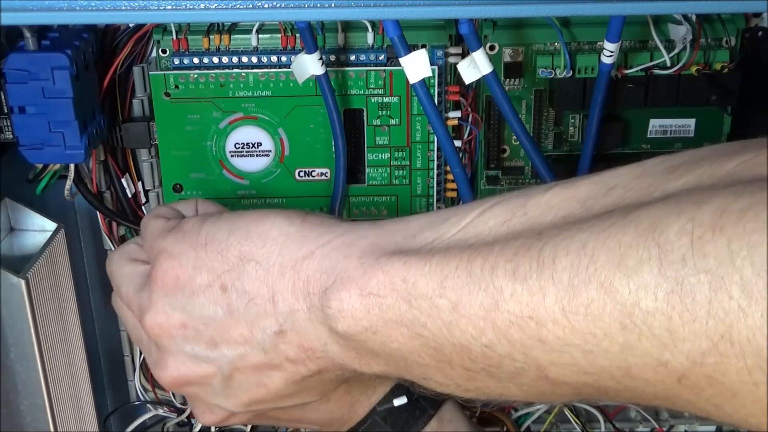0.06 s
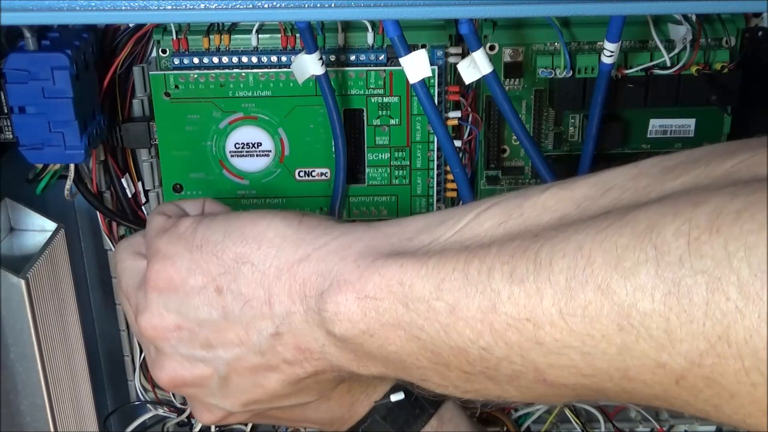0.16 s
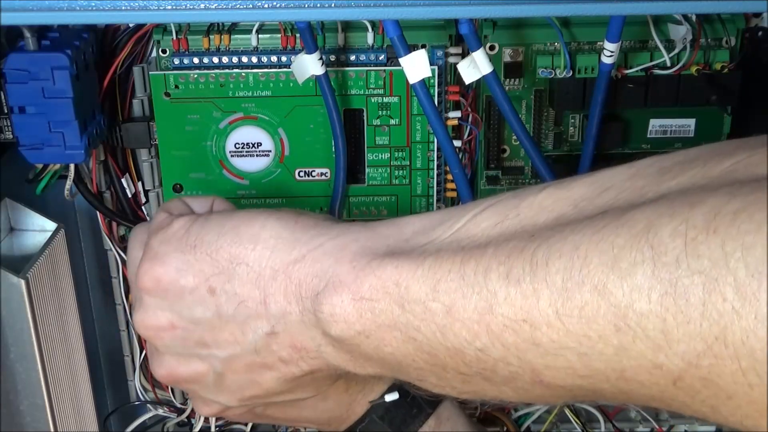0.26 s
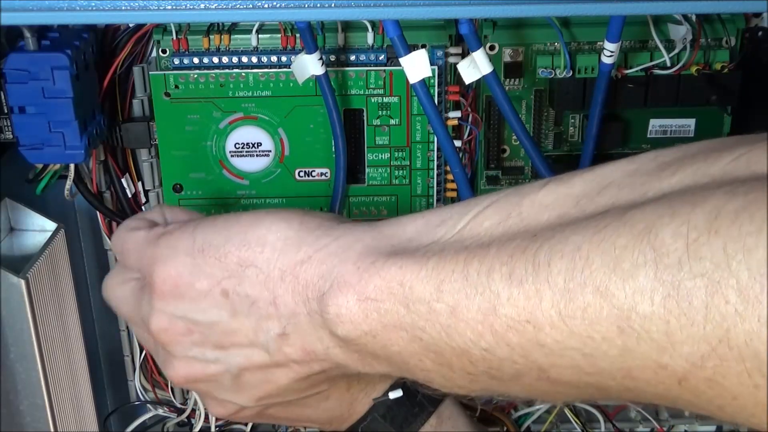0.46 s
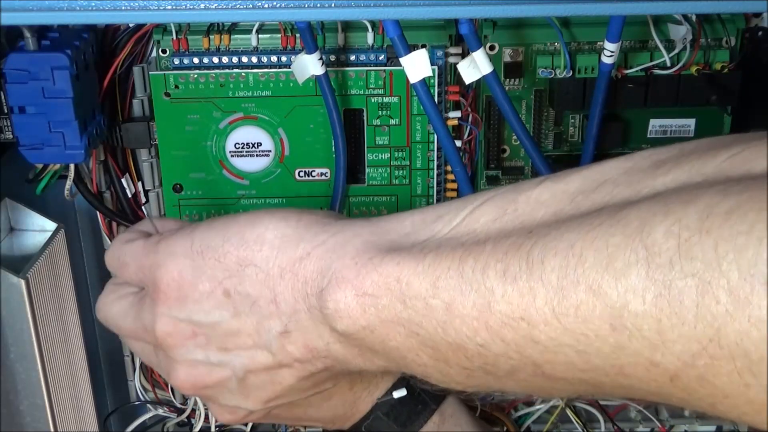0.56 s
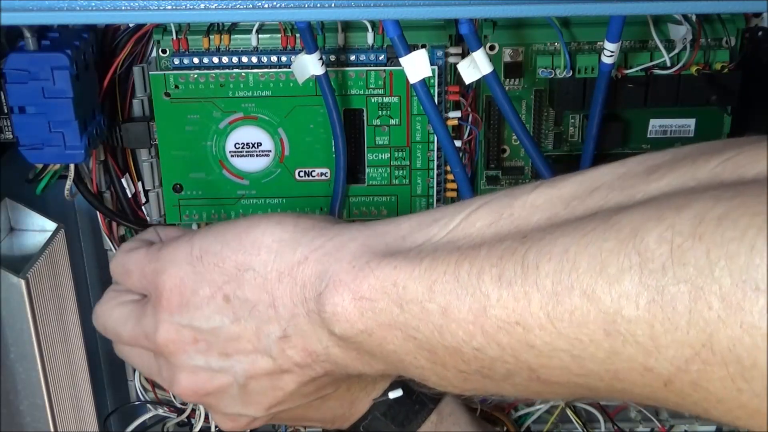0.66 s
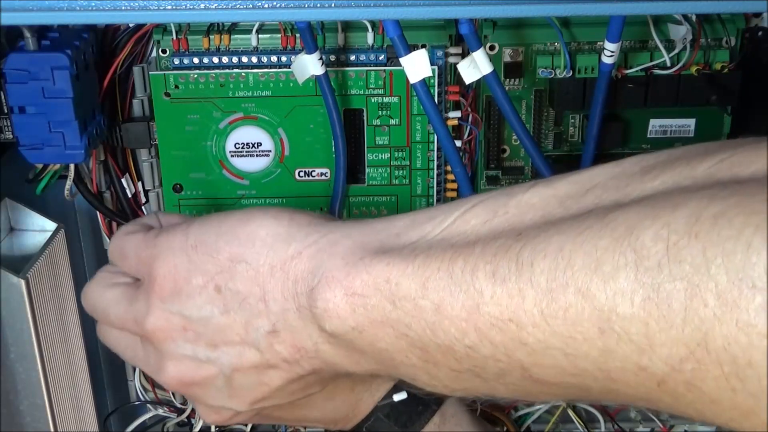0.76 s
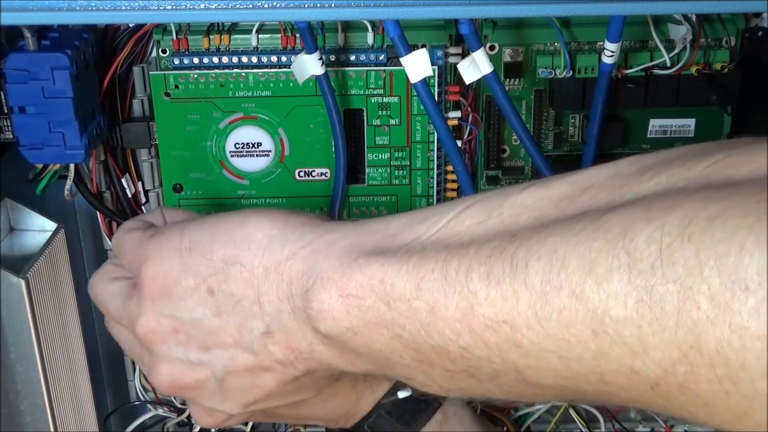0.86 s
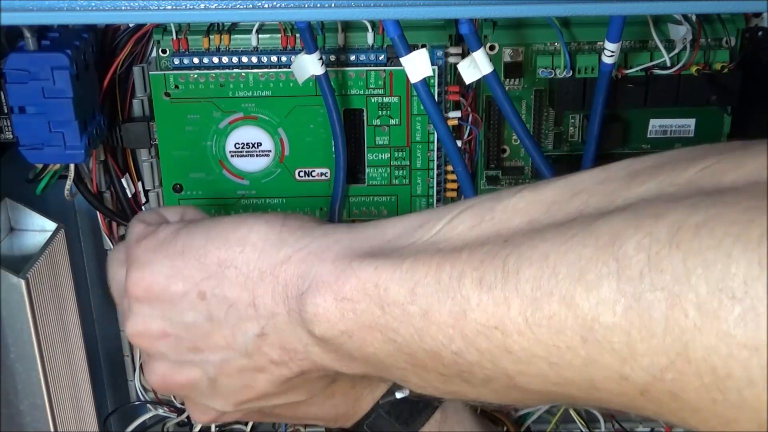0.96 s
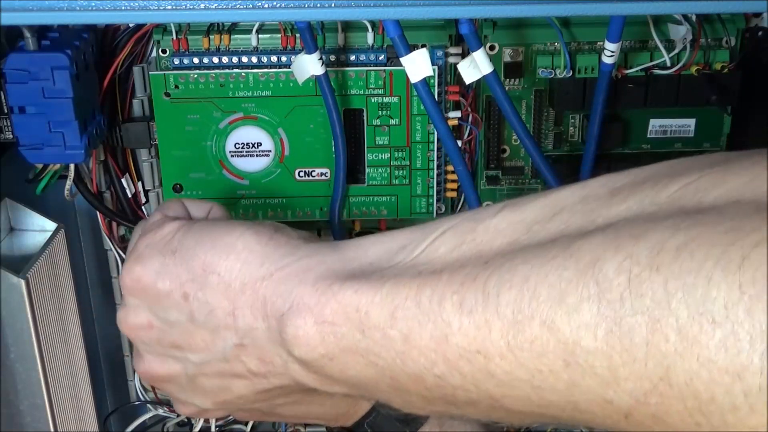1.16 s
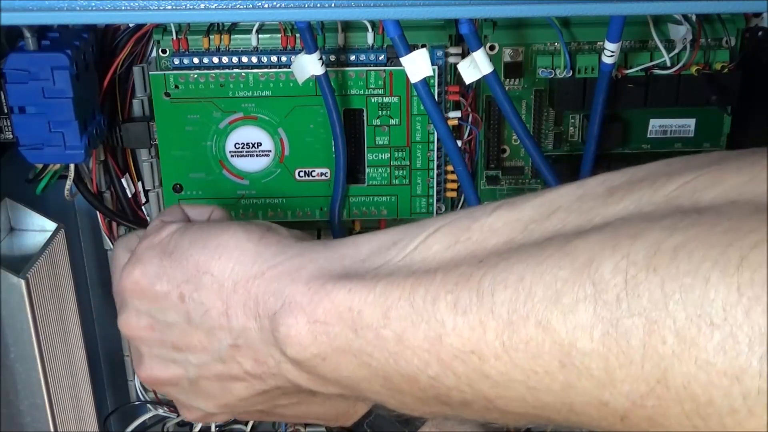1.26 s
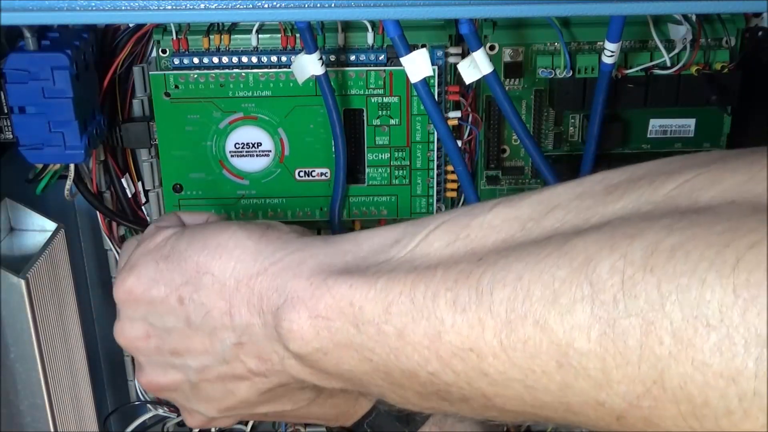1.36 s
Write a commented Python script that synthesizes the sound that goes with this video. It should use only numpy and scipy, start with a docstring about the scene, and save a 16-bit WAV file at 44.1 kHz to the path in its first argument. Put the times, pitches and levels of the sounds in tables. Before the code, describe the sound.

Hands working wires and plastic connectors, with light clicks, a sharp tiny squeak and soft rustling

```python
"""In a control cabinet, hands work wires and plastic connectors close to a microphone.
Taps and soft bumps ring the housing and its parts; a wire squeaks very high against a terminal.
Sleeves and strands rustle as many tiny noise grains. Short tones make a faint tick about 30 times
a second, over the shaped noise of the workshop's hush. Noise tails add the cabinet and walls."""
import sys
import numpy as np
from scipy import signal
from scipy.fft import rfft, irfft
from scipy.io import wavfile
from scipy.ndimage import uniform_filter1d

SR = 44100
rng = np.random.default_rng(int(sys.argv[2]) if len(sys.argv) > 2 else 0)


def wrap_up_sound(samples):
    """Save the sound to the file named by the first command line argument, as 16-bit audio."""
    columns = np.atleast_2d(samples).T
    # keep every value between -1 and 1, then stretch to whole-number steps
    tamed = np.clip(columns, -1, 1)
    steps = np.round(tamed * 32767).astype(np.int16)
    wavfile.write(sys.argv[1], SR, steps)


N = 61739  # samples, 1.4 s


def undb(db):
    """Turn decibels into a plain multiplier."""
    return 10 ** (np.asarray(db) / 20)


def level(x, db):
    """Set the average strength (RMS) of x."""
    return x * undb(db) / np.sqrt(np.mean(x ** 2))


def band(x, lo_hz, hi_hz):
    """Keep only the pitches between two limits."""
    return signal.sosfilt(signal.butter(3, [lo_hz, hi_hz], "bandpass", fs=SR, output="sos"), x)


def fade_60(t, t60_s):
    """A natural fade that falls by 60 dB in t60_s seconds."""
    return np.exp(-np.log(1000) * t / t60_s)


def ring(x, hz, t60_s):
    """One fading resonance, set ringing by x."""
    pole = np.exp(2j * np.pi * hz / SR - np.log(1000) / (t60_s * SR))
    return signal.lfilter([1], [1, -pole], x).imag


def add(out, x, start_s):
    """Mix x into out from start_s on."""
    i = int(start_s * SR)
    out[i:i + len(x)] += x[:N - i]


def blip(peak_s, db, hz, width_ms):
    """A tone that swells and fades around peak_s; its width is taken at half height."""
    time = np.arange(N) / SR - peak_s
    swell = np.exp(-np.log(16) * (time * 1000 / width_ms) ** 2)
    return undb(db) * swell * np.sin(2 * np.pi * hz * time)


def hush():
    """Workshop air and microphone hiss: steady shaped noise, partly the same left and right."""
    # colour of the hush before its overall level is set: pitch_hz, level_db (per Hz)
    hush_colour = [(25, -21.5), (70, -16), (120, -4), (160, -0.5), (200, -9), (280, -0.5), (500, -5),
                   (1000, 0), (1400, -6), (2500, -8.5), (4000, -12.5), (7000, -13), (10000, -15.5),
                   (15500, -18.5)]
    # how wide the hush is: pitch_hz, side_minus_mid_db
    hush_width = [(100, -26), (400, -6), (2000, -2.5), (6000, -4), (12000, -26)]
    log_hz = np.log(np.maximum(np.arange(N // 2 + 1) * SR / N, 1))

    def curve(table):
        pitch_hz, db = np.array(table).T
        return undb(np.interp(log_hz, np.log(pitch_hz), db))

    mid, side = rfft(rng.standard_normal((2, N))) * curve(hush_colour)
    side = side * curve(hush_width)
    return level(irfft(np.array([mid + side, mid - side]), N), -54.5)


def rustle():
    """Dense uneven grains through skin, sleeve and wire resonances; each rub swells and dies."""
    # rubs: peak_s, rise_s, fall_s, then low_db, middle_db and treble_db of the grains
    rubs = [(.005, 0.0083, 0.057, -57, -55.5, -59), (0.126, 0.042, 0.044, -55, -52.5, -52.5),
            (0.248, 0.032, 0.024, -47.5, -44.5, -31.5), (.43, 0.012, 0.084, -60, -65, -58.5),
            (0.189, 0.013, 0.011, -41, -43.5, -52), (0.199, 0.0084, .01, -63, -61, -57),
            (1.111, 0.016, 0.03, -61.5, -62.5, -61.5), (0.507, 0.023, 0.01, -48, -49.5, -63),
            (0.551, 0.015, 0.016, -61, -59.5, -75), (.625, 0.016, 0.031, -58, -49, -52),
            (0.876, 0.0098, 0.042, -55.5, -61, -66), (0.978, 0.022, 0.012, -45.5, -39.5, -39.5),
            (1.182, 0.016, 0.017, -64.5, -53, -47), (1.365, 0.016, 0.016, -45, -41.5, -37),
            (1.39, 0.0083, 0.036, -50, -45.5, -37)]
    # resonances of the low, middle and treble grains: pitch_hz, width_hz, level_db
    rub_colours = [
        [(707, 300, -4.5), (1534, 530, 2)],
        [(3390, 1900, 0), (4850, 670, -4), (6870, 2000, -3.5)],
        [(8405, 800, -4), (9980, 900, 0), (11500, 1590, -3), (13000, 2440, -10.5)],
    ]
    grains_per_s, grain_spread_db = 4500, -0.5
    t, out = np.arange(N) / SR, np.zeros(N)
    for k, colour in enumerate(rub_colours):
        hits = rng.random(N) < grains_per_s / SR
        uneven = undb(grain_spread_db * rng.exponential(size=N))
        grains = hits * rng.standard_normal(N) * uneven
        tone, swell = 0, 0
        for hz, width_hz, db in colour:
            part = band(grains, hz - width_hz / 2, hz + width_hz / 2)
            tone = tone + undb(db) * level(part, 0)
        for peak_s, rise_s, fall_s, *grain_db in rubs:
            rise = -((t - peak_s) / rise_s) ** 2
            fall = (peak_s - t) / fall_s
            swell = swell + undb(grain_db[k]) * np.exp(np.where(t < peak_s, rise, fall))
        out = out + swell * level(tone, 0)
    return out


def tick():
    """A steady faint tick of short tones, every second one weaker, each a little uneven."""
    first_s, ticks_per_s = .003, 30000 / 1001
    out = np.zeros(N)
    for k in range(42):
        db = -51 - 4 * (k % 2) + 2 * rng.standard_normal()
        out = out + blip(first_s + k / ticks_per_s, db, hz=3320, width_ms=3)
    return out


def unit(x):
    """Bring the first 10 ms to an average strength (RMS) of one."""
    return x / np.sqrt(np.mean(x[:SR // 100] ** 2))


def taps():
    """A short rattle rings the parts; the box is driven at its own pitch; a dry crack on top."""
    # taps: start_s (before a small lag), crack_db (before the crack gain), then, before each
    # part's gain, box_db, low_panel_db, high_panel_db, plug_db, clip_db, latch_db, metal_db
    tap_list = [(.035, -42, -59.5, -50, -42.5, -47.5, -45, -54, -50),
                (.1005, -44, -76, -64, -47.5, -54, -47, -54, -56),
                (.1785, -39, -26.5, -28.5, -37, -29.5, -32, -35.5, -35),
                (.233, -50.5, -57, -45.5, -39, -58.5, -43, -57, -37.5),
                (.267, -40, -66, -54, -39, -51, -67, -49, -38),
                (.381, -42, -48, -50.5, -65.5, -74, -68, -72, -65),
                (.403, -34, -46, -52.5, -55.5, -65, -66, -56.5, -61),
                (.421, -36, -52, -64, -56.5, -57.5, -68, -61, -62.5),
                (.437, -40, -51, -59, -58, -59, -51, -58, -53),
                (.492, -1.5, -43.5, -35.5, -43, -27.5, -30.5, -29.5, -29.5),
                (.623, -32, -39.5, -45, -42.5, -45, -40, -49.5, -51),
                (.841, -49.5, -55, -52, -50.5, -63, -66.5, -63.5, -66.5),
                (.861, -48, -49.5, -58.5, -57.5, -57.5, -61, -64, -64),
                (.877, -43, -47, -52.5, -56, -56.5, -61, -56.5, -55),
                (.891, -48, -53.5, -50, -48, -56.5, -61.5, -69, -58),
                (.93, -31, -57, -52, -42.5, -48.5, -49, -58, -55),
                (.954, -36, -53, -60, -69, -50, -41, -56, -59),
                (.9685, -6, -59, -34, -31.5, -39.5, -34, -46, -44),
                (.978, -23, -52.5, -33, -28, -37, -31.5, -45, -35),
                (1.001, -45, -55.5, -56, -43.5, -52, -51, -66, -63),
                (1.141, -44, -47, -46, -58, -54, -60.5, -62, -55),
                (1.16, -41.5, -43.5, -43.5, -48.5, -43.5, -49, -62, -47.5),
                (1.275, -31.5, -40, -34, -40.5, -45.5, -34.5, -53, -53),
                (1.323, -38, -39.5, -45, -45, -51, -52, -57, -46.5),
                (1.357, -45, -43.5, -45.5, -52, -64, -63, -42.5, -40),
                (1.38, -36, -54, -56, -51, -46, -64, -38, -33)]
    # ringing pitches of each part, before small random shifts: pitch_hz, level_db, t60_s
    box = [(705, 0, .045), (765, -8, .03), (960, -16, .03)]
    low_panel = [(1200, -8, .03), (1400, -1, .03), (1510, 0, .035)]
    high_panel = [(1670, 0, .06), (1960, -8, .02)]
    plug = [(2350, -5, .02), (2560, -3, .025), (2810, 0, .035), (3060, -2, .03)]
    clip = [(3320, -4, .02), (3560, 0, .03), (3770, -2, .035), (3980, -5, .02)]
    latch = [(4300, -1, .015), (4650, 0, .015), (4950, -3, .015)]
    metal = [(8300, -6, .015), (9200, 0, .02), (9750, -3, .015), (10600, -8, .012), (11500, -10, .01)]
    # one entry for each part, in the same order: gain_db
    part_gain_db = [-2, -5.5, -8, -6, -6, -5, -4.5]
    # time constant of the drive to each part: fade_s
    contact_s = [.0035, .003, .003, .0035, .003, .003, .0035]
    # pitch range of each part: from_hz, to_hz
    part_range = [(560, 1080), (1150, 1620), (1450, 2250), (2150, 3200), (3150, 4200), (4100, 5500),
                  (6200, 12500)]
    # bare rattle beside the ringing of each part: level_db
    bare_db = [-15, -8, -10, -8, -6, -4, -5]
    crack_gain_db, crack_fade_s, lag_s = -22, .001, .0003
    spread_db, detune = 2.5, .015  # random spread of ring levels, and of pitches as a fraction

    out, t = np.zeros(N), np.arange(SR // 6) / SR
    parts = (box, low_panel, high_panel, plug, clip, latch, metal)
    for start_s, crack_db, *part_db in tap_list:
        rattle = rng.standard_normal(len(t))
        rattle[0] = 3  # a firm first contact
        crack = band(rattle * np.exp(-t / crack_fade_s), 900, 12860)
        tap = undb(crack_db + crack_gain_db) * crack
        for k, modes in enumerate(parts):
            fade = np.exp(-t / contact_s[k])
            rings = 0
            for hz, db, t60_s in modes:
                level_luck, pitch_luck = rng.standard_normal(2)
                hz = hz * (1 + detune * pitch_luck)
                # the hollow box (k = 0) swells more slowly, pushed at its own pitch
                drive = np.cos(2 * np.pi * hz * t) if k == 0 else rattle
                rings = rings + undb(db + spread_db * level_luck) * unit(ring(fade * drive, hz, t60_s))
            bare = unit(band(fade * rattle, *part_range[k]))
            sound = unit(band(rings, *part_range[k])) + undb(bare_db[k]) * bare
            tap = tap + unit(sound) * undb(part_db[k] + part_gain_db[k])
        add(out, tap, start_s + lag_s)
    return out


def squeaks():
    """A wire squeaks on a terminal: very short tones that swell and fade. A few lower tones of the same kind
    ring briefly with the taps."""
    # short tones, mostly squeaks, a few lower ones with the taps: peak_s, level_db, pitch_hz, width_ms
    squeak_list = [(.1185, -37, 8300, 4), (.214, -27, 9430, .9), (.2179, -22, 9580, .9),
                   (.2222, -17, 9850, 2.2), (.2245, -12.5, 9650, 3), (.2278, -.5, 9430, 2.7),
                   (.2315, -1.5, 9330, 1.1), (.2328, -8, 9000, 1.1), (.2349, -9.6, 9140, 1.3),
                   (.2374, -16.5, 9240, 1.4), (.2282, -23, 10550, 2), (.2335, -19, 8350, 2.5),
                   (.264, -27, 8550, 2), (1.162, -43, 5700, 3), (.2545, -33, 3450, 4),
                   (.2525, -38, 4700, 2), (.24, -19, 9180, 1.2), (.2432, -22.6, 8880, .8),
                   (.2459, -17.5, 9100, .9), (.255, -23, 9410, 1.2), (.2572, -21, 9310, .9),
                   (.2771, -24.6, 10750, 1.9), (.2688, -16, 10650, 3.6), (.2688, -17, 11400, 3),
                   (.4934, -19, 9300, 1.2), (.4933, -21, 4650, 1.3), (.9815, -26, 12000, 1.1),
                   (1.3649, -27, 9290, 1.4), (1.3804, -27, 9620, 1.2), (1.3828, -25, 9810, .9)]
    return sum(blip(*row) for row in squeak_list)


def bumps():
    """Soft bumps of the hand on the housing: low fading tones with a softened start."""
    # bumps: start_s, level_db (before the soft start and fade), pitch_hz, t60_s
    bump_list = [(0.179, -39, 301.5, 0.16), (0.186, -49, 156.4, 0.19), (0.182, -35.5, 512, 0.091),
                 (0.199, -35.5, 391, 0.054), (0.199, -42.5, 266, 0.13), (1.164, -50.5, 303, 0.15),
                 (1.169, -48, 153.4, 0.11), (1.216, -54.5, 156, 0.29), (1.367, -47, 298, 0.074)]
    out, t = np.zeros(N), np.arange(SR // 4) / SR
    soft_start = 1 - np.exp(-t / 0.00053)
    for start_s, db, hz, t60_s in bump_list:
        tone = np.sin(2 * np.pi * hz * t)
        add(out, undb(db) * soft_start * fade_60(t, t60_s) * tone, start_s)
    return out


def room(x):
    """Cabinet and walls: x is smeared by fading noise tails, band by band."""
    # tails, the last being the inside of the cabinet: from_hz, to_hz, t60_s, mid_db, side_db
    tail_list = [(146, 520, 0.088, -19.5, -24), (1170, 7900, 0.26, -13.5, -24),
                 (5950, 22000, 0.23, -20, -29), (888, 5400, 0.0536, -19, -9.5)]
    t, tail = np.arange(SR // 2) / SR, 0
    soft_start = np.minimum(t / 0.0031, 1)
    for from_hz, to_hz, t60_s, *mid_side_db in tail_list:
        noise = band(rng.standard_normal((2, len(t))), from_hz, to_hz)
        part = noise * fade_60(t, t60_s) * soft_start
        # long and short tails get a similar total energy
        even_out = np.sqrt(2 * np.log(1000) / (t60_s * SR))
        tail = tail + part * undb(mid_side_db)[:, None] * even_out
    mid, side = signal.fftconvolve(x[None], tail, axes=1)[:, :N]
    return np.array([mid + side, mid - side])


def scene():
    """Hands a touch to the left, with their room sound, over the tick and hush."""
    hands = taps() + bumps() + rustle() + squeaks()
    pan_db = 0.26  # left minus right
    direct = hands * undb([[pan_db / 2], [-pan_db / 2]])
    return direct + room(hands) + tick() + hush()


def record(dry):
    """The microphone drops the bass; full scale clips; the top is cut."""
    low_cut_hz, top_hz = 85, 15690
    bass_cut = signal.butter(1, low_cut_hz, "highpass", fs=SR, output="sos")
    top_cut = signal.ellip(10, .2, 70, top_hz, fs=SR, output="sos")
    clipped = np.clip(signal.sosfilt(bass_cut, dry), -1, 1)
    return signal.sosfilt(top_cut, clipped)


dry = scene()
out = record(dry)
wrap_up_sound(out)
```